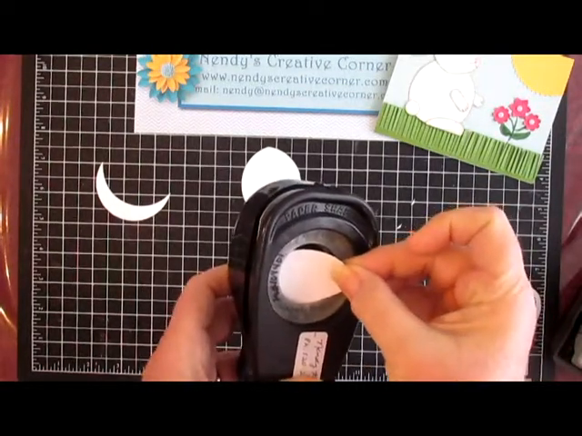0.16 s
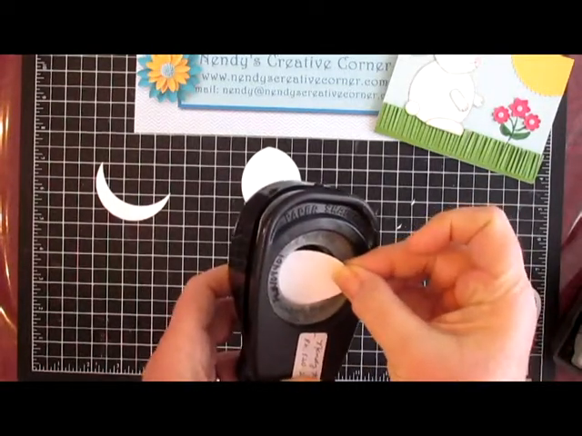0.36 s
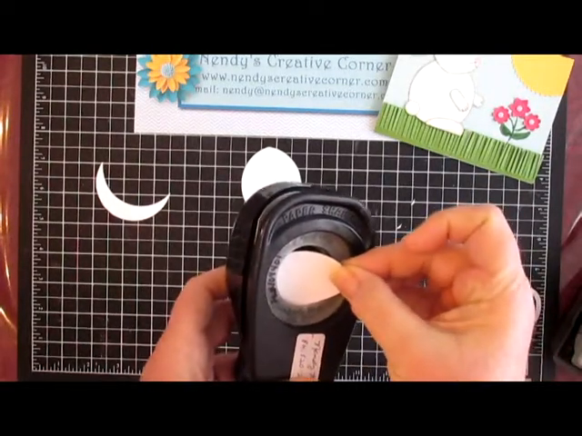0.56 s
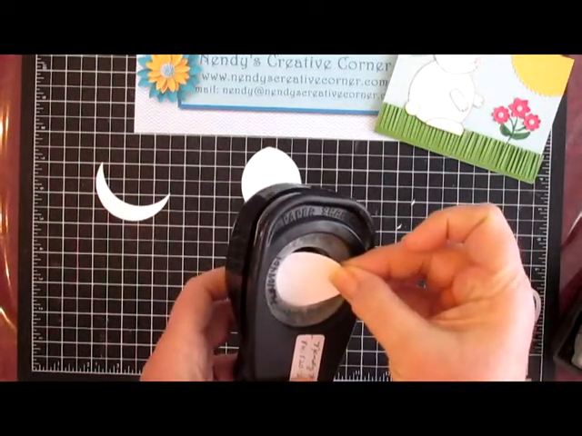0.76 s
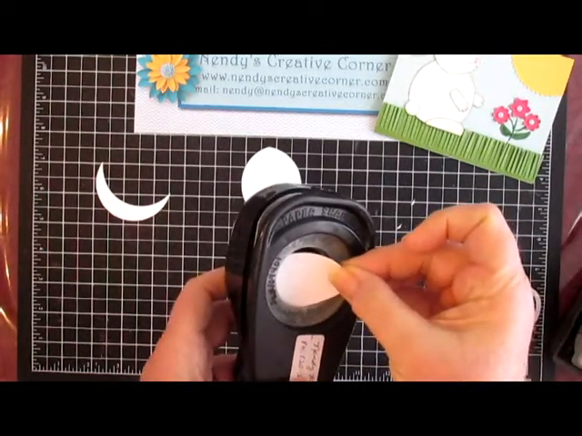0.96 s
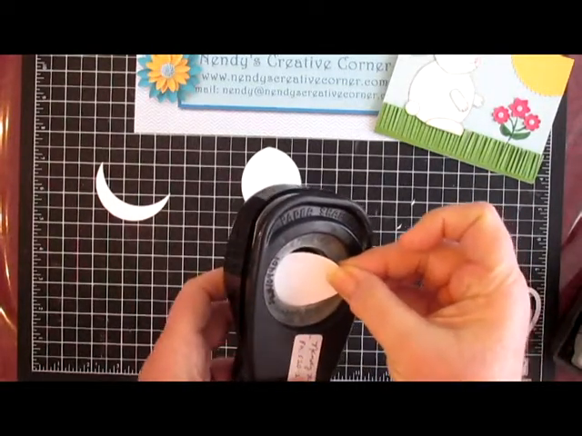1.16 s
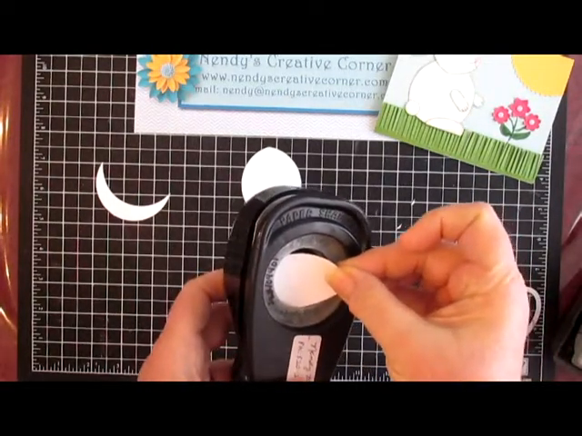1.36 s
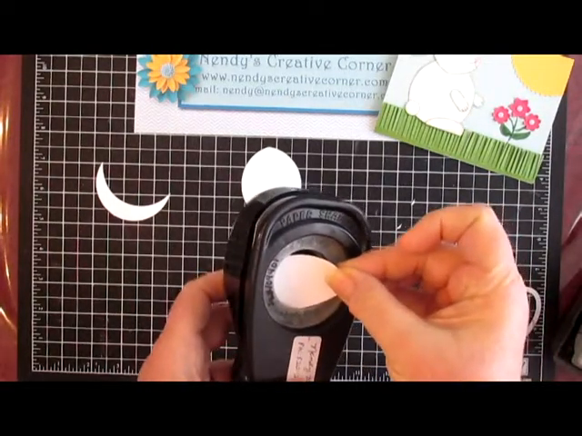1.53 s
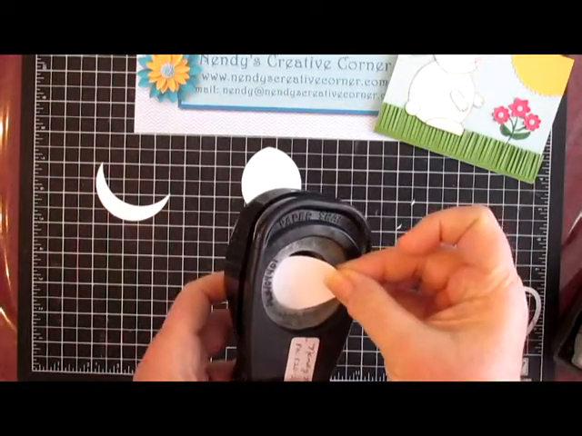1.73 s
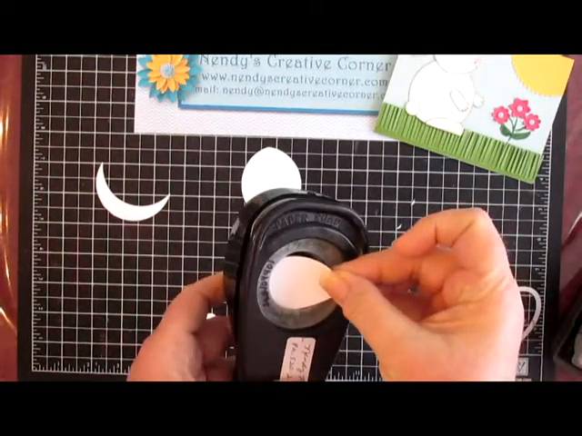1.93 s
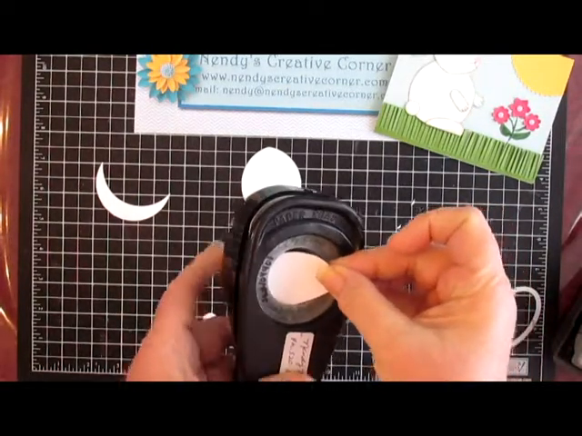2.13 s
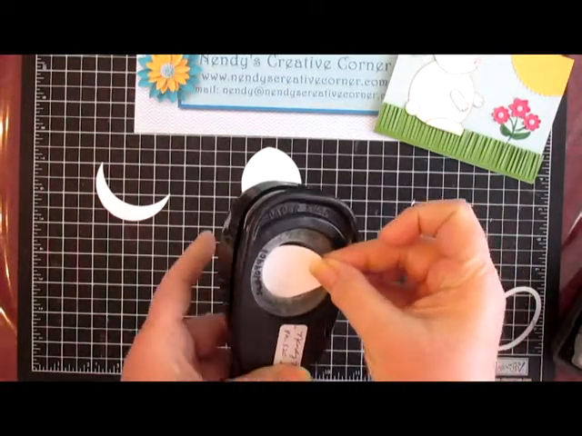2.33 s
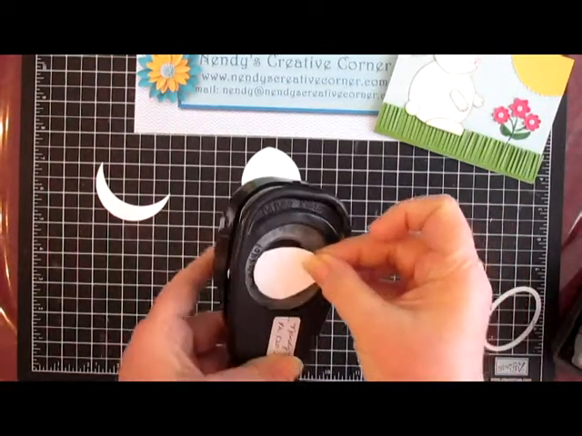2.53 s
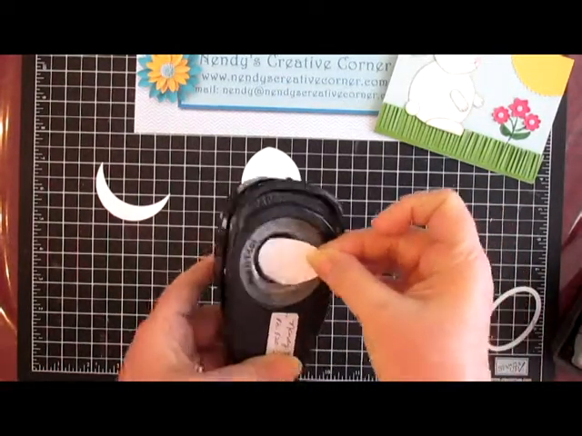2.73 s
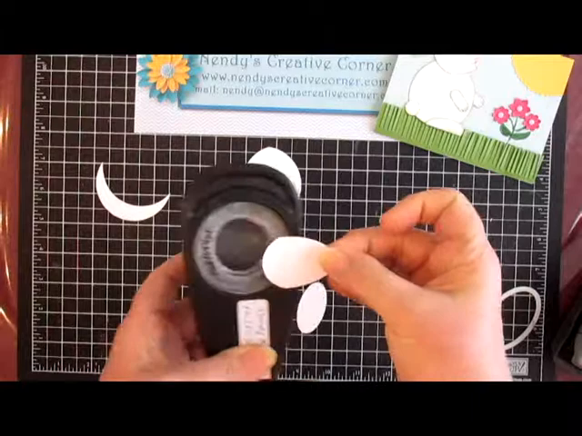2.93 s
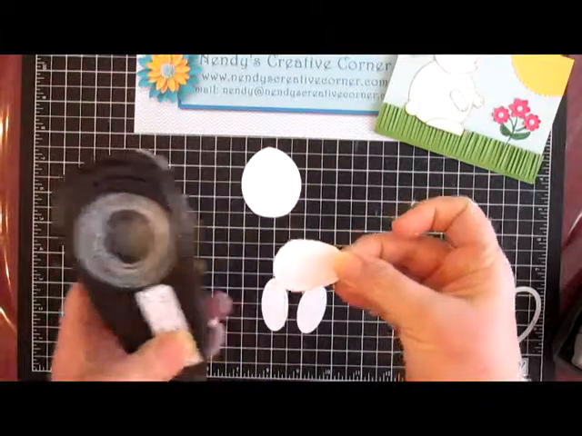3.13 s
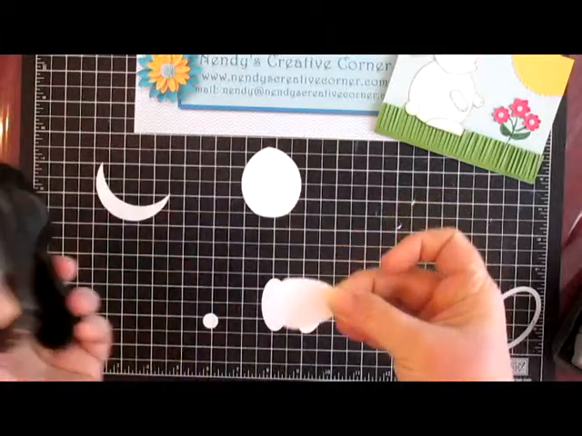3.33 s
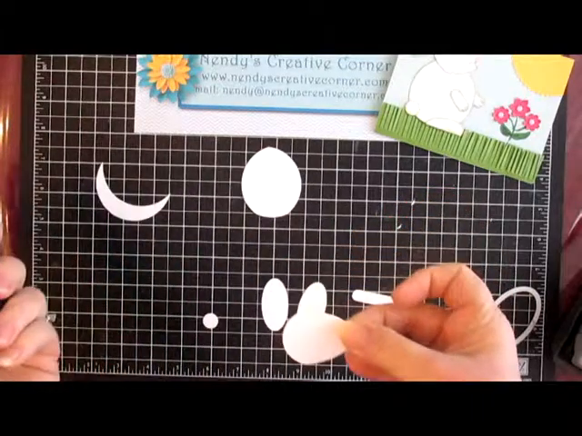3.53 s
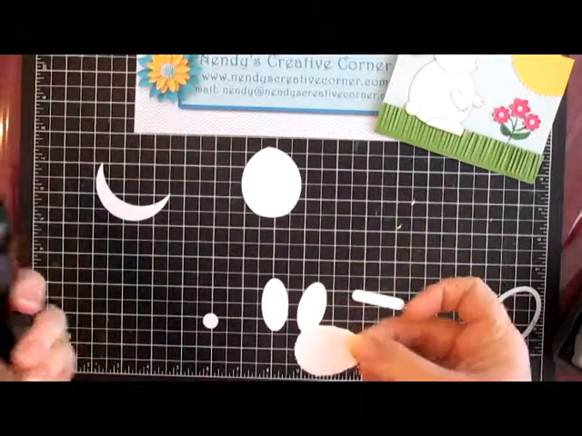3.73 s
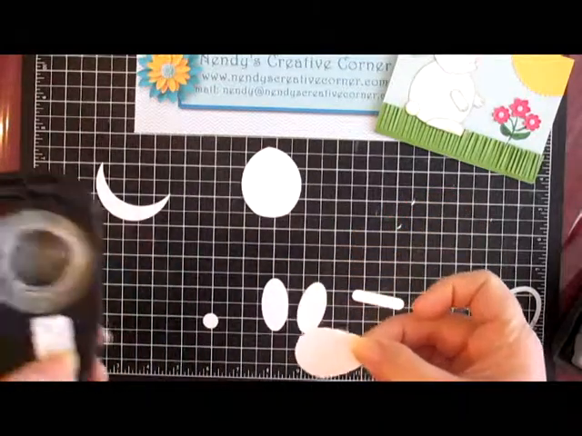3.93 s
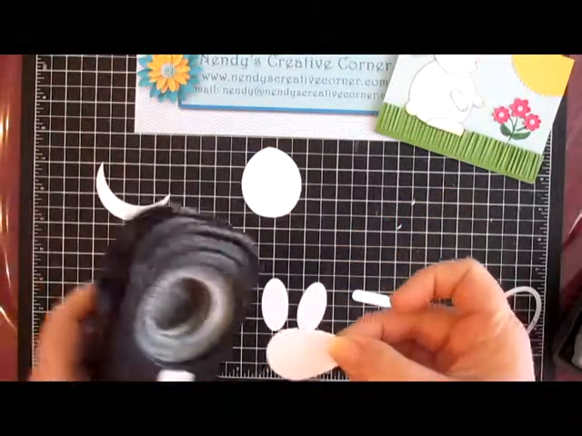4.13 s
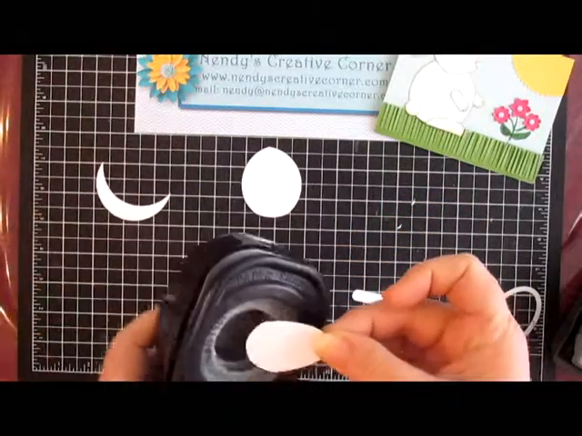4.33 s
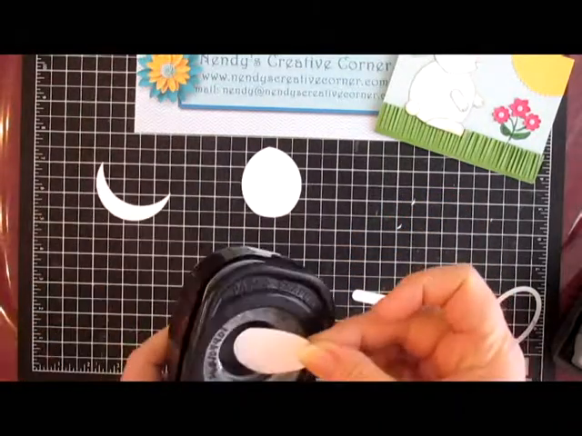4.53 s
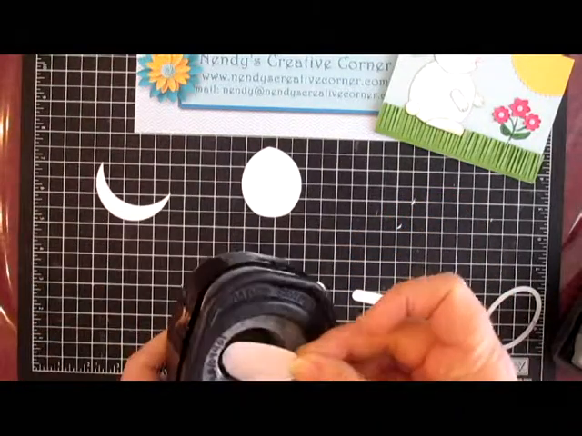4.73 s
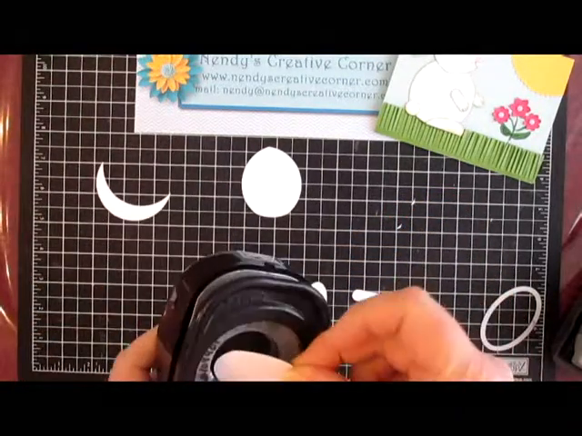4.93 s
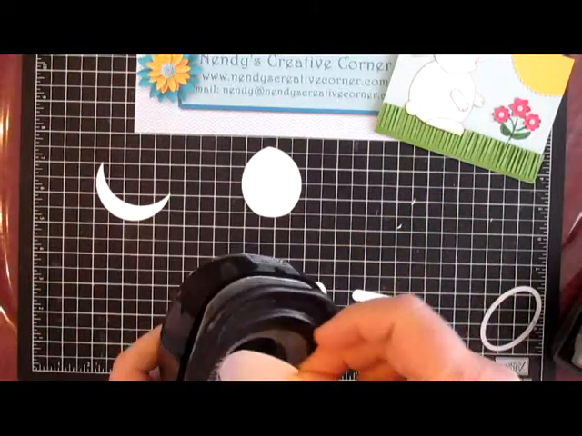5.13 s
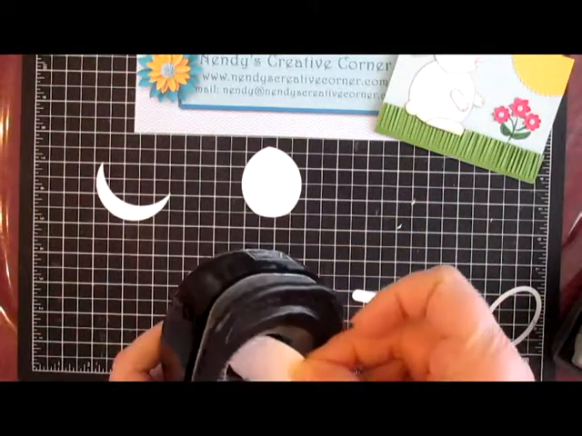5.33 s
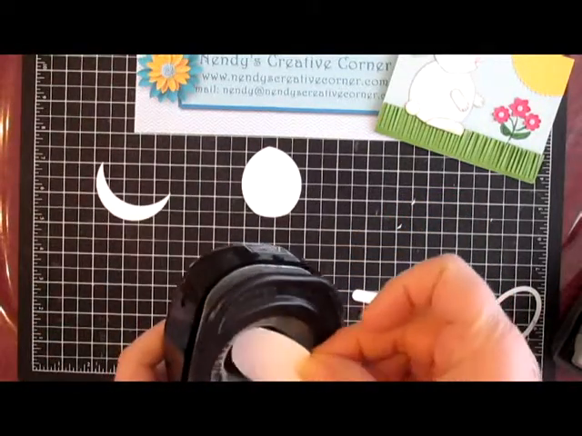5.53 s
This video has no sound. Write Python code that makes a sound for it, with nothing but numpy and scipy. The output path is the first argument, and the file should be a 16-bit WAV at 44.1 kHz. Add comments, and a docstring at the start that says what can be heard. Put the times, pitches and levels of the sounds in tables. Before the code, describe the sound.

Soft air noise, a fan and a low electrical hum run throughout in a small room. Apart from a tiny rattle at the start, little happens until about 1.7 seconds, when the spring of a handheld craft punch gives three quick, growing metallic pings close to the microphone. From 2.1 seconds the die bites into card with a crunchy run of cracks, breaking through at 2.5 seconds with one sharp snap, by far the loudest sound. The lever clacks back brightly at 2.8 seconds, with a brief scrape of card. A faint arm rustle follows, and at 3.6 seconds a dull tap lands on the desk, slightly left, trailed by a few small ticks. Between 4 and 4.8 seconds card slides into the slot with barely audible squeaks and rubbing. A cluster of light clicks and rattles comes from the punch around 5.2 to 5.4 seconds.

```python
"""At a desk in a small room, a handheld craft punch is squeezed through card. Its spring pings in
free vibration, the die bites in a run of cracks that excite the modes of the punch body and snaps
through, and the lever clacks back. Something taps the damped desk, then card is fed in again with
friction, faint stick-slip squeaks and light rattles. Air noise, a fan and mains hum lie under it all."""
import sys
import numpy as np
from scipy import signal
from scipy.fft import rfft, irfft
from scipy.io import wavfile
from scipy.ndimage import uniform_filter1d, minimum_filter1d

SR = 44100
rng = np.random.default_rng(int(sys.argv[2]) if len(sys.argv) > 2 else 0)


def dump_mix(stems):
    """Bounce the given channels to the path in sys.argv[1] as a 16-bit WAV at rate SR."""
    frames = np.atleast_2d(stems).T  # one column per channel
    limited = np.clip(frames, -1, 1)  # hard clip at full scale
    pcm = np.round(limited * 32767).astype(np.int16)
    wavfile.write(sys.argv[1], SR, pcm)


N = 246607
FILTER_SIZE = 4096
HZ = np.fft.rfftfreq(FILTER_SIZE, 1 / SR)

# air noise spectrum: (frequency [Hz], relative level [dB])
AIR_SPECTRUM = [(25, -29.5), (55, -8.5), (95, -13.5), (150, -8), (260, -9), (400, -9.5), (750, -13.5),
                (1400, -20.5), (2400, -28.5), (4200, -29.5), (5500, -28), (7500, -29), (10500, -36.5),
                (13000, -32), (16000, -37)]
# likeness of the air noise left and right: (frequency [Hz], coherence [0-1])
AIR_COHERENCE = [(30, 0), (130, 0.34), (300, 0.92), (640, 0.45), (1400, .35), (3000, 0.014), (15000, 0)]
# mains hum: (frequency [Hz], level [dB])
HUM_LINES = [(59.5, -74), (120.2, -57.5)]
# wavering fan tones: (frequency [Hz], bandwidth [Hz], level [dB])
FAN_TONES = [(165, 10, -70.5), (203, 13, -68), (316.3, 21, -59.5), (386.3, 16, -67)]
# reverberation time: (frequency [Hz], t60 [s])
ROOM_DECAY = [(150, .3), (500, .33), (1500, 0.36), (4000, 0.26), (8000, 0.23), (15000, 0.31)]
# spectrum of the reflections: (frequency [Hz], relative level [dB])
ROOM_SPECTRUM = [(150, -1), (500, 4.5), (1100, -2), (4000, -1), (8000, -0.5), (15000, -8)]
# the punch at the two microphone ports: (frequency [Hz], left minus right [dB])
PUNCH_BALANCE = [(100, 2.5), (1400, -0.5), (2200, -4), (3600, -3), (5000, 3), (7400, 3), (9500, 4.5),
                 (12000, 0.5), (16000, 7)]

# spectra of the five kinds of contact: (frequency [Hz], relative level [dB])
FRICTION_SPECTRUM = [(300, -6), (1400, -2.5), (3000, -4), (7000, -9), (10000, -9.5), (15000, -10)]
TAP_SPECTRUM = [(150, -44), (500, -28), (800, -11), (1400, 0), (2200, -8.5), (4200, -16), (6800, -11),
                (9000, -24), (15000, -27)]
RATTLE_SPECTRUM = [(120, -14), (300, -12), (700, -2.5), (1400, 3), (1800, -5.5), (2500, 2.5), (3400, 1),
                   (4000, -9.5), (7500, -5.5), (10000, -14.5), (15000, -24.5)]
BITE_SPECTRUM = [(120, -21.5), (300, -7), (800, 5.5), (1700, -6.5), (2600, -6), (4000, -9), (6000, -4.5),
                 (9500, -13), (15000, -16)]
SNAP_SPECTRUM = [(40, -59), (150, -31), (350, -11), (560, -14), (1100, 2), (2000, -3), (4000, -3.5),
                 (7000, -4.5), (10000, -8), (15000, -12)]
# punch body modes: (frequency [Hz], bandwidth [Hz], lift [dB], relative ring level [dB], t60 [s])
BODY_MODES = [(388.2, 98, 12, -26.5, .25), (1108, 29, 4.5, -23, 0.29), (1432, 110, 8.5, -25.5, .35),
              (2060, 160, 2.5, -26, 0.23), (2340, 380, 5, -35.5, .2), (3170, 700, 4.5, -23, .25),
              (4590, 220, 4.5, -26, .36), (4940, 160, 5.5, -29.5, .2), (6670, 520, 2, -27, 0.14),
              (7250, 110, 5.5, -29, .2), (8700, 670, 4, -37, .2), (11800, 360, 6, -39, .15),
              (12500, 400, 10, -37.5, .15)]
# spring modes: (frequency [Hz], relative level [dB], t60 [s])
SPRING_MODES = [(1290, -4.5, 0.099), (2315, 0.5, .07), (2474, 6, 0.072), (3426, -1.5, 0.053),
                (4690, -10, 0.09), (5270, -8, 0.05), (5650, -13, 0.19), (6010, -7, 0.12), (6980, -17, 0.18),
                (7740, -12.5, 0.11), (9300, -19, 0.061), (12000, -27, 0.045), (14450, -26, .03)]

# the arm brushing past: (centre time [s], half length [s], level [dB])
ARM_BRUSHES = [(3.322, 0.12, -64), (3.461, 0.095, -54.5), (3.823, 0.17, -62)]
# card sliding in the slot: (centre time [s], half length [s], level [dB], resonance [Hz])
CARD_RUBS = [(2.776, 0.053, -53, 3800), (2.976, 0.02, -55, 5600), (3.055, 0.046, -60, 6500),
             (4.61, 0.041, -65.5, 6320), (4.692, 0.027, -58, 6470)]
# card squeaking: (time [s], level [dB], starting frequency [Hz])
CARD_SQUEAKS = [(3.993, -70, 3220), (4.108, -74, 3217), (4.229, -73, 3700), (4.38, -68, 4130)]
# the card's edge flicking the slot: (time [s], level [dB])
CARD_FLICKS = [(5.027, -59.5), (5.1771, -58.5), (5.5403, -61), (5.5676, -61.5)]
# taps on the desk, mostly dull, ending in one thin bright tick: (time [s], level [dB], treble [dB])
DESK_TAPS = [(3.6144, -25.5, -6), (3.7631, -46.5, -4), (3.777, -49.5, 0), (3.787, -48.5, -23),
             (3.812, -53, -7), (3.8562, -49.5, 48)]
# loose lever and card in the housing: (time [s], level [dB], length [s], treble [dB], resonance [Hz])
LOOSE_RATTLES = [(0.106, -52, 0.0083, -4, 3800), (0.119, -55.5, 0.015, -6, 1900),
                 (2.9475, -53, 0.0078, 14, 6070), (2.9966, -53.5, .0056, 22, 2990),
                 (4.766, -59.5, 0.0079, 10, 3080), (4.799, -57, 0.0084, 6, 3100),
                 (5.197, -50.5, 0.0058, 8, 3210), (5.216, -45, 0.0058, -10, 1380),
                 (5.2988, -37, 0.00086, 0, 2100), (5.3278, -35, 0.0033, 9, 2450),
                 (5.3325, -31.5, 0.0019, 2, 3200), (5.385, -39.5, 0.0031, -4, 3150),
                 (5.392, -41, 0.005, -1.5, 1310), (5.402, -41.5, 0.0034, 12, 3100)]
# the spring slipping on its seat: (time [s], level [dB], spectral slope [dB/octave])
SPRING_PINGS = [(1.718, -58.5, -3), (1.7727, -47.5, 8.5), (1.8454, -36.5, 1)]
# the lever's scrape, then its stop: (time [s], level [dB], length [s], resonance [Hz])
LEVER_RETURN = [(2.8049, -31.5, 0.00595, 7690), (2.8076, -28.5, 0.0029, 3010)]
# the die biting the card: (time [s], level [dB], length [s], bass [dB], resonance [Hz])
DIE_BITES = [(2.1096, -34, .004, 4, 3020), (2.138, -42.5, .005, -3.5, 3260),
             (2.205, -31.5, .003, -5.5, 4900), (2.2072, -33, .003, -5.5, 2820),
             (2.2735, -28, .0052, 6, 5100), (2.2887, -30, .0025, 6, 4800), (2.3269, -28, .005, -1, 2380),
             (2.355, -24, .0062, -7.5, 2370), (2.4892, -51.5, .002, 0, 8990),
             (2.5002, -41.5, .003, 2, 1599)]
# the die breaking through to its stop:
# (time [s], level [dB], length [s], bass [dB], treble [dB], resonance [Hz])
DIE_SNAP = [(2.5041, -12.5, 0.0045, -2.5, -2, 4450), (2.5073, -12, 0.0042, -1, 4.5, 2100),
            (2.51, -9.5, .0017, 5, -6.5, 6590)]
SQUEEZE_S, CUT_S = 2.10, 2.35  # the load builds between these times


def amp(db):
    """Amplitude grows tenfold for every 20 dB."""
    return 10 ** (np.asarray(db) / 20)


def unit_rms(x):
    """Normalisation to unit mean power."""
    return x / np.sqrt(np.mean(x ** 2) + 1e-20)


def sized(x, db):
    """Equal energy: a transient is scaled to match 10 ms at the given level."""
    return amp(db) * x * np.sqrt(SR / 100) / np.linalg.norm(x)


def read(points, hz):
    """Interpolation of a table on a log-frequency axis."""
    f, value = np.transpose(points)
    return np.interp(np.log(hz + 1), np.log(f + 1), value)


def add(mix, s, sound):
    """Superposition: a sound joins the mix at time s."""
    part = mix[max(round(s * SR), 0):][:len(sound)]
    part += sound[:len(part)]


def shaped(x, db):
    """Zero-phase filtering by a gain in dB on the HZ grid."""
    return irfft(rfft(x) * amp(np.interp(np.fft.rfftfreq(N, 1 / SR), HZ, db)), N)


def causal(db):
    """Minimum phase: the impulse response with this spectrum that starts at once and rings out."""
    log_gain = np.log(amp(np.r_[db, db[-2:0:-1]]))
    return irfft(np.exp(np.conj(signal.hilbert(log_gain)))[:len(HZ)])


def resonance(hz, width, f=HZ):
    """A Lorentzian resonance curve of height 1."""
    return 1 / (1 + (2 * (f - hz) / width) ** 2)


def contact_tone(treble_db, hz, lift_db):
    """Contact filtering, in dB: hardness sets the treble, and position favours one resonance."""
    return treble_db * HZ ** 2 / (HZ ** 2 + 5000 ** 2) + lift_db * resonance(hz, .16 * hz)


def room_tone(air_db=-55.5):
    """Partly coherent air noise at the two ports, with pure mains tones and narrow-band fan noise."""
    t, f = np.arange(N) / SR, np.fft.rfftfreq(N, 1 / SR)
    shared, left, right, fan = rfft(rng.standard_normal((4, N)))
    coherence = np.clip(read(AIR_COHERENCE, f), 0, 1)
    noise = np.sqrt(coherence) * shared + np.sqrt(1 - coherence) * np.array([left, right])
    air = irfft(noise * amp(read(AIR_SPECTRUM, f)), N)
    hum = sum(amp(db) * np.sin(2 * np.pi * (hz * t + rng.random())) for hz, db in HUM_LINES)
    whirr = sum(amp(db) * unit_rms(irfft(fan * resonance(hz, width, f), N))
                for hz, width, db in FAN_TONES)
    return amp(air_db) * unit_rms(air) + hum + whirr


def reverberation(x, early_db, early_s, gap_s=.0012, echoes_per_s=4000):
    """Sparse reflections, strongest from the nearby desk, decay exponentially at each band's rate."""
    t = np.arange(SR // 2) / SR
    echoes = rng.standard_normal((2, len(t))) * (rng.random((2, len(t))) < echoes_per_s / SR)
    echoes = echoes * (t > gap_s) * amp(early_db * np.exp(-t / early_s))
    hz, when, bands = signal.stft(echoes, SR, nperseg=256)
    same = resonance(0, 2600, hz)[:, None]  # long waves reach both ports alike
    bands = np.array([bands[0], same * bands[0] + np.sqrt(1 - same ** 2) * bands[1]])
    decay = amp(read(ROOM_SPECTRUM, hz)[:, None] - 60 * when / read(ROOM_DECAY, hz)[:, None])
    tail = signal.istft(bands * decay, SR, nperseg=256)[1]
    tail /= np.linalg.norm(tail, axis=1, keepdims=True)
    return signal.fftconvolve(x[None], tail, axes=1)[:, :N]


def placed(x, left_db, lead_s):
    """Level and time differences give direction: the left port leads by left_db and lead_s."""
    delay = np.exp(-2j * np.pi * np.fft.rfftfreq(N, 1 / SR) * lead_s)
    left, right = shaped(x, left_db / 2), shaped(x, -left_db / 2)
    return np.array([left, irfft(rfft(right) * delay, N)])


def friction(s, half_s, db, treble_db, hz, lift_db, grain_db=1.5):
    """Sliding friction makes grainy noise that swells and fades around time s."""
    t = np.arange(N) / SR
    noise = rng.standard_normal(N)
    roughness = unit_rms(uniform_filter1d(rng.standard_normal(N), size=90))
    spectrum_db = read(FRICTION_SPECTRUM, HZ) + contact_tone(treble_db, hz, lift_db)
    hiss = unit_rms(shaped(noise * amp(grain_db * roughness), spectrum_db))
    return amp(db) * hiss * np.exp(-((t - s) / half_s) ** 4)


def arm_brushes():
    """Broadband friction: the moving arm rustles softly."""
    return sum(friction(s, half_s, db, treble_db=-2.8, hz=1570, lift_db=4.5)
               for s, half_s, db in ARM_BRUSHES)


def card_rubs():
    """Friction through a resonance: card slides in the slot with a narrow hiss."""
    return sum(friction(s, half_s, db, treble_db=0, hz=hz, lift_db=15) for s, half_s, db, hz in CARD_RUBS)


def card_squeaks(length_s=.063, fall=.32, jitter=.088):
    """Stick-slip oscillation, uneven and slowing as the card comes to rest."""
    out, progress = np.zeros(N), np.linspace(0, 1, int(length_s * SR))
    for s, db, first_hz in CARD_SQUEAKS:
        waver = unit_rms(uniform_filter1d(rng.standard_normal(N), size=30))[:len(progress)]
        hz = first_hz * (1 - fall * progress ** 2) * (1 + jitter * waver)
        squeak = np.sin(np.pi * progress) * np.sin(2 * np.pi * np.cumsum(hz) / SR)
        add(out, s, amp(db) * unit_rms(squeak))
    return out


def desk_taps(corner_hz=6000):
    """Heavy damping: the desk answers each blow with a few cycles and no ring."""
    out = np.zeros(N)
    for s, db, treble_db in DESK_TAPS:
        spectrum_db = read(TAP_SPECTRUM, HZ) + treble_db * HZ ** 2 / (HZ ** 2 + corner_hz ** 2)
        add(out, s, sized(causal(spectrum_db), db))
    return out


def chatter(length_s, crumble_db, rise_s=.0004, fall_s=.001, crumble_s=.009):
    """Impulsive excitation: dense tiny contacts stop quickly, and a weaker crumbling follows."""
    t = np.arange(FILTER_SIZE) / SR
    after = np.maximum(t - length_s, 0)
    release = np.exp(-after / fall_s) + amp(crumble_db) * np.exp(-after / crumble_s)
    force = (1 - np.exp(-t / rise_s)) * release
    spectrum = rfft(force * rng.standard_normal(FILTER_SIZE))
    evenness = .5 + .5 * resonance(0, 2400)  # a steady push in the bass, ragged notches in the treble
    return np.sqrt(force) * irfft(spectrum / (abs(spectrum) + 1e-9) ** evenness)


def crack(spectrum, db, length_s, crumble_db, hz, lift_db, bass_db=0, treble_db=0):
    """Source and filter: a burst of contacts is coloured by the resonances of the punch body."""
    modes_db = sum(lift * resonance(mode_hz, width) for mode_hz, width, lift, _, _ in BODY_MODES)
    shelf_db = bass_db / (1 + (HZ / 900) ** 2)
    response = causal(read(spectrum, HZ) + modes_db + shelf_db + contact_tone(treble_db, hz, lift_db))
    return sized(signal.fftconvolve(chatter(length_s, crumble_db), response), db)


def ringing(x, ring_db):
    """Free decay: the modes of the punch body linger faintly after each crack."""
    t = np.arange(SR // 2) / SR
    ring = sum(amp(db - 60 * t / t60) * np.cos(2 * np.pi * hz * t) / np.sqrt(t60 * SR)
               for hz, _, _, db, t60 in BODY_MODES)
    return x + amp(ring_db) * signal.fftconvolve(x, ring)[:N]


def knock(db, hz, t60, rise_s=.0031):
    """A damped oscillator: the hollow housing gives one short note."""
    t = np.arange(SR // 6) / SR
    envelope = (1 - np.exp(-t / rise_s)) * amp(-60 * t / t60)
    return sized(envelope * np.sin(2 * np.pi * hz * t), db)


def card_flicks():
    """Brief contact reaches high frequencies: the card's edge makes thin, bright ticks."""
    out = np.zeros(N)
    for s, db in CARD_FLICKS:
        tick = crack(RATTLE_SPECTRUM, db, length_s=.0022, crumble_db=-16, hz=8990, lift_db=5, treble_db=10)
        add(out, s, tick)
    return out


def rattles():
    """Light impacts of loose parts each excite a faint note of the housing."""
    out = np.zeros(N)
    for s, db, length_s, treble_db, hz in LOOSE_RATTLES:
        add(out, s, crack(RATTLE_SPECTRUM, db, length_s, crumble_db=-10, hz=hz, lift_db=9.5,
                          bass_db=7.5, treble_db=treble_db))
        add(out, s, knock(db - 13, hz=1391, t60=.037))
    return ringing(out, ring_db=-10.5)


def spring(rise_s=.0009, pivot_hz=2500, scrape_db=-10):
    """Modal vibration: the steel spring scrapes for an instant, then rings in inharmonic partials."""
    out, t = np.zeros(N), np.arange(SR // 3) / SR
    scrape_response = causal(read(RATTLE_SPECTRUM, HZ) + 8 * resonance(6100, 4000))
    for s, level_db, slope_db in SPRING_PINGS:
        ping = np.zeros(len(t))
        for hz, db, t60 in SPRING_MODES:
            envelope = amp(db + slope_db * np.log2(hz / pivot_hz) - 60 * t / t60)
            ping += envelope * np.sin(2 * np.pi * (hz * t + rng.random()))
        add(out, s, sized(ping * (1 - np.exp(-t / rise_s)), level_db))
        scrape = signal.fftconvolve(chatter(length_s=.006, crumble_db=-3), scrape_response)
        add(out, s, sized(scrape, level_db + scrape_db))
    return out


def lever():
    """Elastic recoil: the unloaded lever scrapes back and strikes its stop, thin and bright."""
    out = np.zeros(N)
    for s, db, length_s, hz in LEVER_RETURN:
        add(out, s, crack(RATTLE_SPECTRUM, db, length_s, crumble_db=-17, hz=hz, lift_db=8.5,
                          bass_db=-21, treble_db=-1))
    add(out, LEVER_RETURN[-1][0], knock(db=-45.5, hz=1037, t60=.027))
    return ringing(out, ring_db=-17)


def fibres(breaks_per_s=2000, peak_db=-47.5, swell_db_per_s=85, fade_db_per_s=170):
    """Acoustic emission: breaking fibres crackle louder under load and fade once the card is cut."""
    t = np.arange(N) / SR
    db = peak_db - swell_db_per_s * np.maximum(CUT_S - t, 0) - fade_db_per_s * np.maximum(t - CUT_S, 0)
    breaks = rng.standard_normal(N) * (rng.random(N) < breaks_per_s / SR)
    crackle = signal.fftconvolve(breaks, causal(read(BITE_SPECTRUM, HZ)))[:N]
    return amp(db) * (t > SQUEEZE_S) * unit_rms(crackle)


def die_bites(slack_hz=800, loaded_hz=1070):
    """Stepwise fracture: each bite cracks the card and knocks the housing, whose note climbs with load."""
    cracks, knocks = np.zeros(N), np.zeros(N)
    for s, db, length_s, bass_db, hz in DIE_BITES:
        add(cracks, s, crack(BITE_SPECTRUM, db, length_s, crumble_db=-6.5, hz=hz, lift_db=10,
                             bass_db=bass_db, treble_db=-1.2))
        load = np.clip((s - SQUEEZE_S) / (CUT_S - SQUEEZE_S), 0, 1) ** 2.1
        add(knocks, s, knock(db - 10.5, hz=slack_hz + (loaded_hz - slack_hz) * load, t60=.045))
    return ringing(cracks, ring_db=-4.5) + knocks


def die_snap():
    """Sudden fracture: the die breaks through in three cracks; the housing thumps under the middle one."""
    cracks, knocks = np.zeros(N), np.zeros(N)
    for s, db, length_s, bass_db, treble_db, hz in DIE_SNAP:
        add(cracks, s, crack(SNAP_SPECTRUM, db, length_s, crumble_db=-30, hz=hz, lift_db=11,
                             bass_db=bass_db, treble_db=treble_db))
    add(knocks, DIE_SNAP[1][0], knock(db=-23.5, hz=1117, t60=.023) + knock(db=-36, hz=374, t60=.072))
    return ringing(cracks, ring_db=-7) + knocks


def scene():
    """Direct-to-reverberant ratio conveys distance: the punch is near, the taps farther off to the left."""
    handling = spring() + die_bites() + fibres() + rattles()
    handling += card_flicks() + card_rubs() + arm_brushes() + card_squeaks()
    action, taps = die_snap() + lever(), desk_taps()
    punch_echoes = reverberation(handling + amp(-1.5) * action, early_db=7, early_s=.024)
    tap_echoes = reverberation(taps, early_db=7.5, early_s=.025)
    tap_left_db = read([(300, 4), (2500, .5), (7000, 8.4)], HZ)
    near = placed(handling + action, read(PUNCH_BALANCE, HZ), lead_s=.000012) + amp(-9) * punch_echoes
    far = placed(taps, tap_left_db, lead_s=.00009) + amp(-6.5) * tap_echoes
    return near + far + room_tone()


def record(dry, recovery_db_per_s=17, limit=.73, cutoff_hz=15950):
    """Compression: gain ducks at peaks over full scale and recovers; a limiter and a low-pass follow."""
    peak_db = 20 * np.log10(abs(dry).max(axis=0) + 1e-9)
    recovery_db = np.arange(N) / SR * recovery_db_per_s
    duck_db = np.maximum(np.maximum.accumulate(peak_db + recovery_db) - recovery_db, 0)
    ducked = dry / amp(uniform_filter1d(duck_db, size=16))
    limiter_gain = np.minimum(limit / (abs(ducked).max(axis=0) + 1e-9), 1)
    limited = ducked * uniform_filter1d(minimum_filter1d(limiter_gain, size=45), size=45)
    low_pass = signal.firwin(401, cutoff_hz, window=("kaiser", 9), fs=SR)
    return signal.oaconvolve(limited, low_pass[None], "same")


dry = scene()
out = record(dry)
dump_mix(out)
```